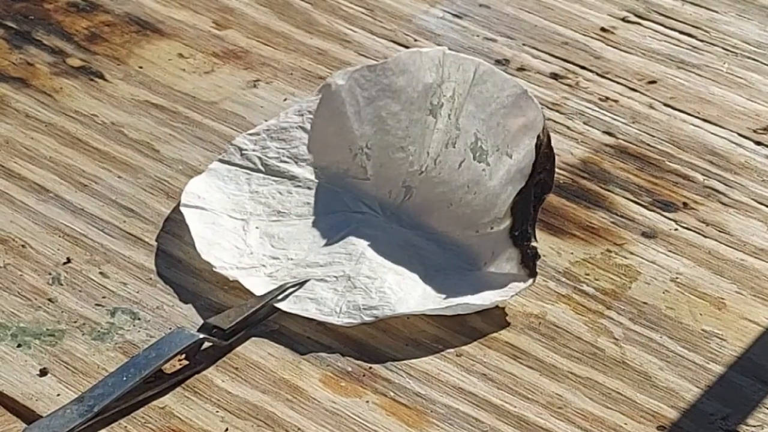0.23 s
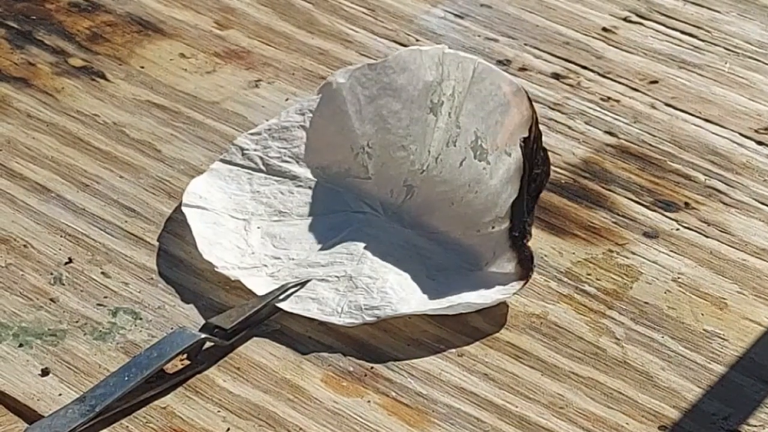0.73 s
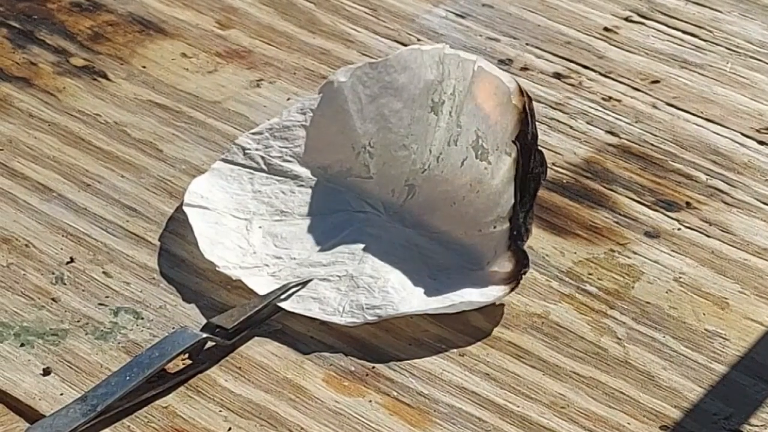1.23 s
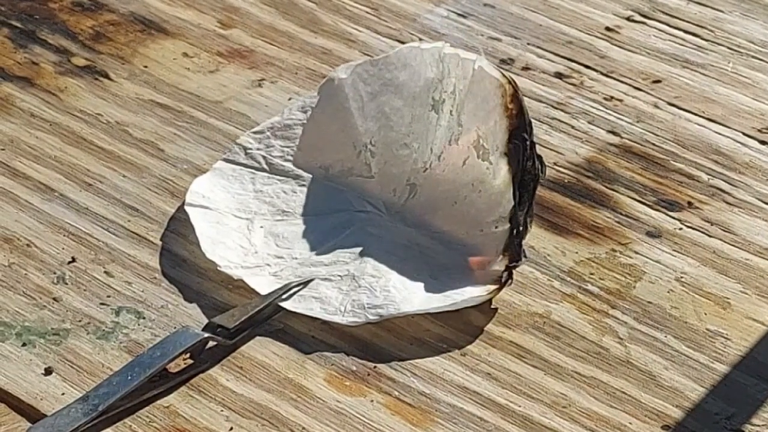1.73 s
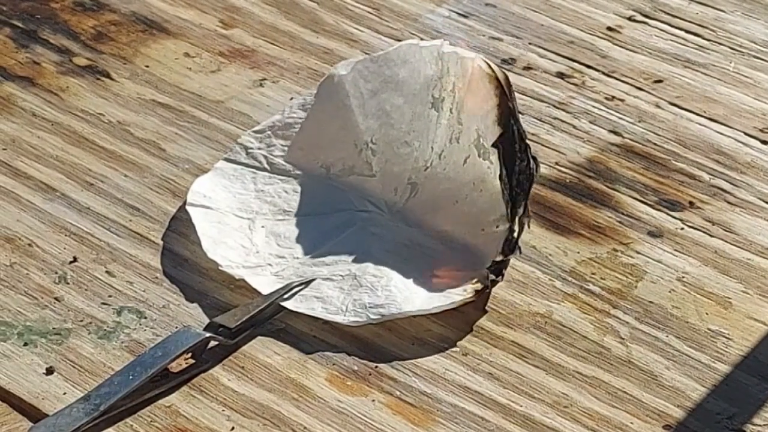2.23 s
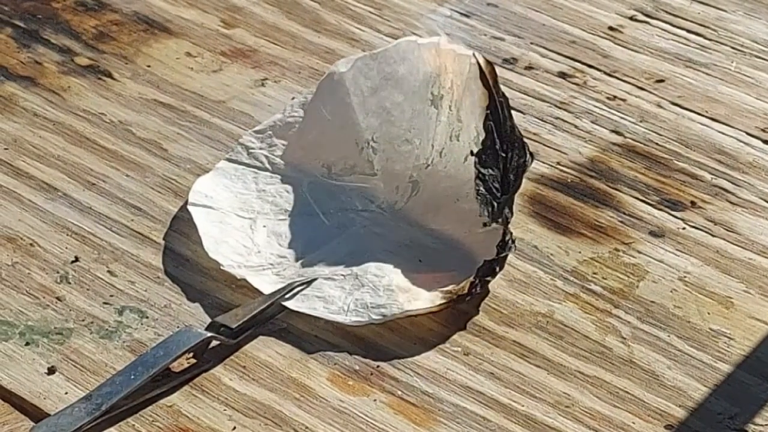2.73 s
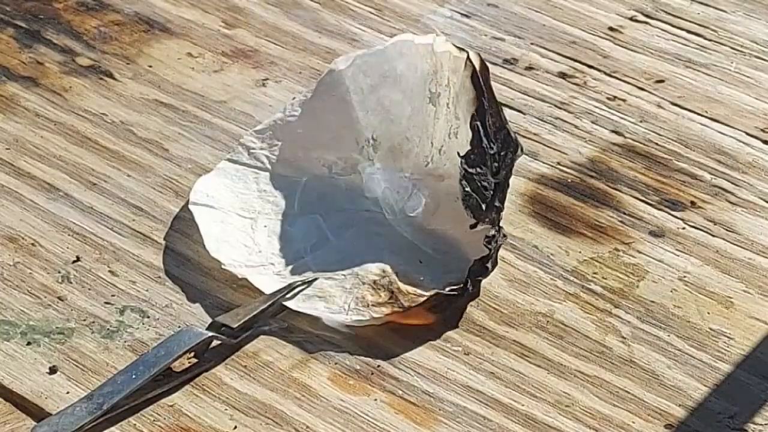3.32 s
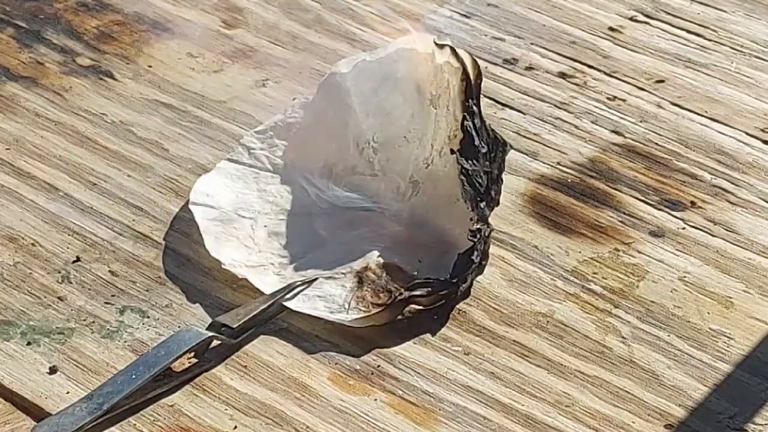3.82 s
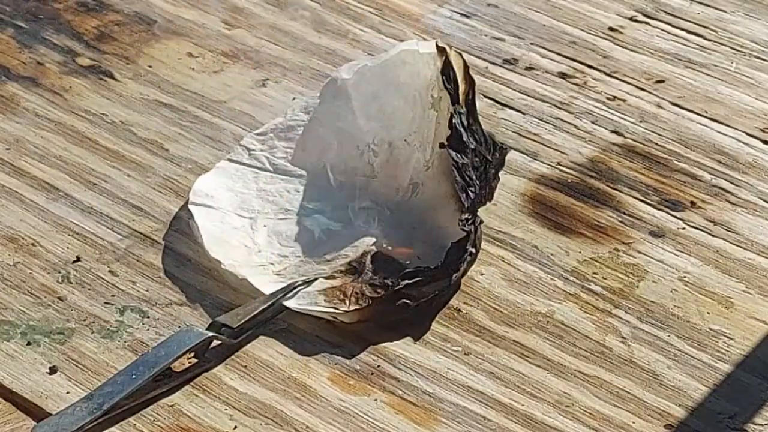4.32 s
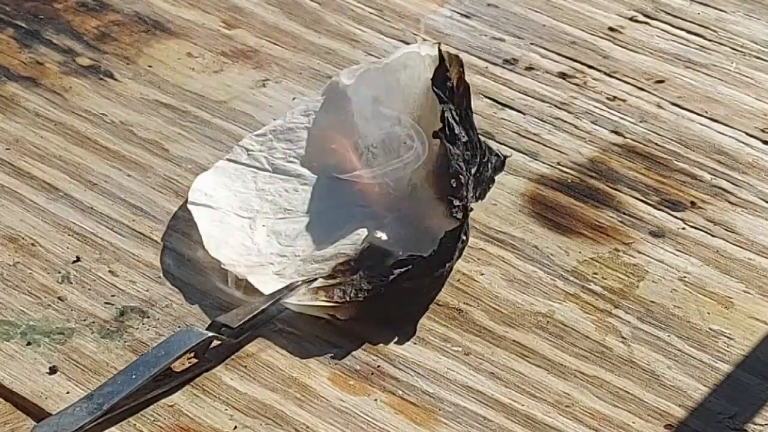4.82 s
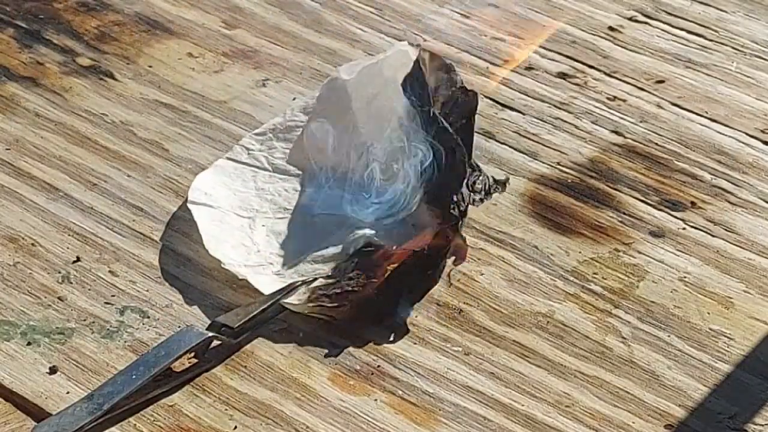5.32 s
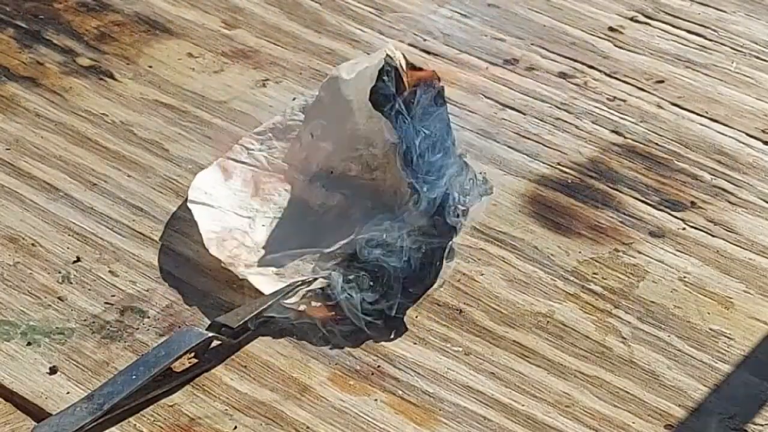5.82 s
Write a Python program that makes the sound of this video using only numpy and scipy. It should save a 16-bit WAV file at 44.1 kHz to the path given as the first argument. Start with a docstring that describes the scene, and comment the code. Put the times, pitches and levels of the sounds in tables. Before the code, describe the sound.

Outdoors, small birds chirp thinly in the distance above a low machine hum and rumble, with a few faint ticks from smouldering paper. The sheet then catches close to the microphone and crackles in sharp, dry, irregular snaps over a fine sizzle. The crackle grows denser, and near the end the flame flares with a soft rustle, flutter and hiss.

```python
"""Paper burning on a board, outdoors.

A folded paper, held in metal tweezers, burns on a wooden board close to a phone's two microphone ports.
The charring sheet snaps in millisecond cracks over a fine sizzle that thickens as the flame spreads.
Small birds whistle in the distance, above a low machine hum and rumble."""
import sys
import numpy as np
from scipy import signal
from scipy.fft import rfft, irfft
from scipy.io import wavfile
from scipy.ndimage import uniform_filter1d

SR = 44100
rng = np.random.default_rng(int(sys.argv[2]) if len(sys.argv) > 2 else 0)


def put_to_file(sound):
    """Save the sound as 16-bit audio at rate SR, in the file named by the first command-line argument."""
    columns = np.atleast_2d(sound).T  # one column per channel
    safe = np.clip(columns, -1, 1)
    whole_steps = np.round(safe * 32767)
    wavfile.write(sys.argv[1], SR, whole_steps.astype(np.int16))


N = 267246
TIME = np.arange(N) / SR
CATCH_S = 1.6  # the sheet starts to crackle

# The main snaps of the sheet. Each row: time in seconds, relative level in dB at 0.8-2.8 kHz,
# bass and treble in dB against that level, rough length in milliseconds.
CRACKS = [(0.365, -77, -2, -8, 2.2), (0.8933, -80, 6, 9, 1.2), (1.352, -85, -4, 10, 0.6),
          (1.6203, -80.5, 1, 13.5, 1), (1.6779, -55.5, -10, 6.5, 0.79), (1.7034, -59.5, -3, 6, 0.32),
          (1.7097, -55.5, -19, -5, 0.47), (1.7153, -57.5, -22, -2, 4.2), (1.7373, -65, -18, 5.5, 1),
          (1.7945, -57, -4, 6, 2.3), (1.8496, -56, -12, -5, 1.2), (1.906, -62, -2, 6.5, 0.46),
          (1.9121, -50, -7, -10, 0.4), (1.954, -65.5, -3, 7, 0.49), (1.996, -67.5, -3, 7.5, 0.63),
          (2.0218, -57, -9, -7, 0.72), (2.0518, -59.5, -5, 8, 0.37), (2.066, -54.5, -16.5, -6, 0.29),
          (2.154, -59, -2, 0, 0.5), (2.1601, -46.5, -8, -2, 0.42), (2.2108, -61, -5, 5, 0.65),
          (2.2438, -44.5, -16, 9, 0.47), (2.274, -52, -16, 3.5, 2.1), (2.2809, -50.5, -14, 0, 0.4),
          (2.289, -49, -19.5, -3, 0.58), (2.3028, -53, -5.5, 5.5, 0.49), (2.309, -47.5, -13, -0.5, 0.6),
          (2.3238, -70, -19, -11, 0.63), (2.3409, -28, -13.5, -1.5, 1.05), (2.4336, -72.5, -16, 18.5, 0.91),
          (2.5193, -79.5, 2, 20.5, 1.3), (2.6957, -60.5, -18, 10.5, 3.5), (2.731, -59.5, -5, 10, 0.5),
          (2.7448, -47.5, -14, 3.5, 0.89), (2.748, -65.5, -14, 14, 0.78), (2.753, -46, -14, -3, 0.39),
          (2.759, -47, -8.5, 4, 1.1), (2.9193, -73.5, 5, 19.5, 0.58), (2.9261, -72.5, 4, 19, 4.2),
          (3.0072, -71, -2, 15, 1.5), (3.0357, -70, -7, 2, 0.7), (3.0468, -56, -9, 8, 0.73),
          (3.076, -65, -6, 14.5, 2.5), (3.1588, -67.5, -17.5, 18.5, 7.2), (3.2335, -56.5, -3, 12, 3.4),
          (3.242, -52, -13, 8, 2.6), (3.2741, -55.5, -21, 7.5, 0.5), (3.2815, -34, -19, -4.5, 1.04),
          (3.2878, -58, 0, 2.5, 0.92), (3.3227, -45, -10, 0.5, 0.74), (3.398, -54, -6, 5.5, 0.89),
          (3.4272, -46, -7, 3, 0.44), (3.4542, -41, 3, 9.5, 0.73), (3.463, -40, 3, 5, 0.69),
          (3.5181, -55, -8, 0, 4.2), (3.5257, -59, 2.5, 10, 1.5), (3.5466, -61, -16.5, 14, 0.29),
          (3.5791, -57.5, -6, 10.5, 2.7), (3.6102, -48.5, -17.5, 2.5, 1.4), (3.633, -40, -6, -3, 0.8),
          (3.6413, -38.5, -1.5, 11.5, 0.37), (3.6441, -21.5, -14, -0.5, 1.8), (3.7262, -54, -11, 2.5, 0.4),
          (3.759, -62, -6, 7, 0.87), (3.8057, -62.5, -8.5, 11.5, 1.3), (3.813, -52.5, -6, 0, 1.7),
          (3.875, -63.5, -7, 10.5, 1), (3.8977, -66.5, 5, 16.5, 0.77), (3.953, -52.5, -12, 8.5, 2.4),
          (3.9613, -57, -6.5, 3, 0.63), (4.001, -61.5, -1, 11, 0.66), (4.0132, -53.5, -5, 5, 0.83),
          (4.0298, -45, -3, 2.5, 0.6), (4.0477, -47.5, 8, 5, 0.98), (4.1248, -68.5, 0, 14, 0.4),
          (4.1762, -65, -12, 17, 1.7), (4.1795, -55, 10, 13.5, 1.7), (4.2438, -60, -23, 6, 0.93),
          (4.25, -60.5, -24, 9, 0.93), (4.2638, -61, -12, 12, 0.61), (4.27, -52.5, -28.5, 9, 0.54),
          (4.2826, -59.5, -3, 7, 0.5), (4.2999, -49, -14, 7.5, 0.16), (4.3067, -45.5, -18, 5.5, 1.2),
          (4.3102, -42, -1, 4, 0.96), (4.4403, -70, -6, 18, 1.6), (4.4619, -51.5, -7, 6, 0.33),
          (4.4851, -51, -0.5, 3.5, 0.24), (4.5241, -63, 7.5, 10, 2.6), (4.5764, -66, -1, 17, 7.5),
          (4.6413, -56.5, -2, 6.5, 2.4), (4.6671, -56, -7, -7, 0.79), (4.6916, -50, -7.5, 3.5, 1.2),
          (4.723, -43.5, -11, 4.5, 0.89), (4.7332, -38, -8.5, 8.5, 0.29), (4.7574, -44, -5, 0.5, 0.24),
          (4.7684, -42.5, -8, -4, 2.4), (4.7774, -43, -3, -4, 3.1), (4.7833, -43.5, -0.5, 1.5, 2.1),
          (4.913, -61, -17, -1.5, 2.4), (4.9431, -40, -10.5, -1.5, 1.9), (4.9525, -53, -23, -0.5, 1.2),
          (4.9693, -53.5, 5, 5.5, 2.9), (4.98, -52, -11, 3.5, 1.7), (5.032, -52.5, -15, 0, 3.9),
          (5.089, -56, -17, -1.5, 0.6), (5.1135, -63.5, -7, 4.5, 0.85), (5.1752, -55.5, 0, 1.5, 0.67),
          (5.2267, -59, 6.5, 0.5, 2.6), (5.248, -65, 8, 4, 0.52), (5.2605, -43, -1, -7, 2.4),
          (5.2673, -49.5, 10, -1.5, 2.1), (5.3876, -34, -0.5, -8, 1.48), (5.3998, -71, 3, 20, 1.6),
          (5.467, -49, -2.5, -10.5, 1.07), (5.499, -40.5, -5.5, -9, 3.4), (5.526, -46, -7.5, -4.5, 1.2),
          (5.5316, -36, -17, -7, 1.1), (5.592, -42.5, -23, -9, 1.1), (5.6697, -39, -10.5, -21.5, 0.71),
          (5.7806, -44, -12, -5, 3.7), (5.7896, -47.5, 4.5, -4, 1.0), (5.8504, -48.5, -8, -7, 1.8),
          (5.95, -41.5, -11, -15.5, 2.3), (5.9737, -62, 7, -12, 1.6), (6.0037, -52, 1, 5, 0.33),
          (6.0532, -26.5, -6, -10.5, 0.26)]
# How hard the edge burns. Each row: time in seconds, relative level in dB.
BURN = [(1.55, -88.0), (1.67, -70.0), (2.12, -74.0), (2.36, -61.0), (2.51, -81.0), (2.538, -68.5),
        (2.658, -80.0), (2.748, -64.5), (2.872, -80.0), (3.17, -63.0), (3.35, -67.0), (3.44, -53.0),
        (3.529, -65.0), (3.71, -53.0), (3.77, -71.5), (4.04, -62.0), (4.071, -72.0), (4.28, -60.0),
        (4.4, -71.0), (4.94, -51.0), (5.0, -67.0), (6.03, -56.0)]
# How high the flame flares. Each row: time in seconds, relative level in dB.
FLARE = [(4.401, -84), (4.761, -64.5), (4.849, -67), (4.939, -62), (5.179, -79.5), (5.271, -69),
         (5.359, -78), (5.39, -63.5), (5.6, -53), (5.839, -65.5), (6.03, -55)]


def undb(db):
    return 10 ** (np.asarray(db) / 20)


def unit(x):
    return x / np.sqrt(np.mean(x ** 2) + 1e-30)


def on_log(hz, table, column=1):
    """One column of a table, read along a logarithmic frequency axis."""
    table = np.array(table, float)
    return np.interp(np.log(hz + 1), np.log(table[:, 0]), table[:, column])


def level_db(curve):
    """A level curve at every sample; silent before it starts."""
    return np.interp(TIME, *np.transpose(curve), left=-120)


def colour(x, table):
    """Filter by a curve of (Hz, dB) points, at unit level."""
    return unit(irfft(rfft(x) * undb(on_log(np.fft.rfftfreq(N, 1 / SR), table)), N))


def walk(rate_hz):
    """Smooth random drift with a spread near 1."""
    hold = int(SR / rate_hz)
    steps = np.repeat(rng.standard_normal(N // hold + 1), hold)
    return unit(uniform_filter1d(steps, hold)[:N])


def add(out, x, start_s):
    """Mix a stereo sound in at its time."""
    i = int(round(start_s * SR))
    a, b = max(i, 0), min(i + x.shape[1], N)
    if b > a:
        out[:, a:b] += x[:, a - i:b - i]


def panned(x, pan_db):
    return x * undb(np.array([[pan_db], [-pan_db]]) / 2)


def ports(x):
    """Sound reaches the two microphone ports with unequal level and phase."""
    # Each row: frequency in Hz, left minus right in dB, left's phase lead in radians.
    response = [(100, -9, 0), (250, -6, 0), (450, -3.5, 0), (1900, -2.7, .1), (5000, -1.5, .45),
                (8300, -2.5, 1.2), (10100, 1, 1.9), (11500, 1.3, 1.7), (14000, .5, 2.0), (16000, 4, 2.2)]
    hz = np.fft.rfftfreq(N, 1 / SR)
    sides = np.array([[.5], [-.5]])
    gain = undb(sides * on_log(hz, response))
    gain /= np.sqrt(np.mean(gain ** 2, axis=0))
    return irfft(rfft(x) * gain * np.exp(1j * sides * on_log(hz, response, column=2)), N)


def echoes(x, t60, dull_hz, delay_s):
    """Diffuse reflections, different at each port."""
    t = TIME[:SR]
    tail = rng.standard_normal((2, SR)) * np.exp(-np.log(1000) * t / t60) * (t > delay_s)
    tail = signal.lfilter(*signal.butter(1, dull_hz, fs=SR), tail)
    tail /= np.sqrt(np.sum(tail ** 2, axis=1, keepdims=True))
    return signal.fftconvolve(x.mean(0)[None], tail, axes=1)[:, :N]


def outdoors(air_db=-69.5, split_hz=380, waver_db=3):
    """A distant machine hums in a rumble shared by both ports; the faint hiss above is diffuse."""
    # The outdoor air. Each row: frequency in Hz, relative level in dB.
    air = [(15, -81), (25, -26), (40, -12), (64, -2), (206, -19), (242, -22), (373, -27), (451, -28),
           (489, -32), (624, -33), (962, -37.5), (1040, -38), (1130, -35.5), (3520, -42), (16000, -43.5)]
    # The machine's tones. Each row: frequency in Hz, level in dB.
    tones = [(59.3, -74.5), (119, -70), (237, -80)]
    low, high = (signal.butter(2, split_hz, kind, fs=SR, output="sos") for kind in ("low", "high"))
    rumble = signal.sosfilt(low, colour(rng.standard_normal(N), air)) * undb(air_db + 0.86 * walk(0.79))
    hiss = signal.sosfilt(high, colour(rng.standard_normal((2, N)), air)) * undb(air_db)
    hum = np.zeros(N)
    for hz, db in tones:
        tone = np.sin(2 * np.pi * hz * TIME + 2.43 * walk(13))
        hum += unit(tone * undb(waver_db * walk(17))) * undb(db)
    return ports(rumble + hum) + panned(hiss, pan_db=-2.5)


def birds(direct_db=-5, wet_db=-5.5, flutter_db=3.5, arch_hz_per_s=1100):
    """Three distant birds call in thin whistles, smeared by the surroundings."""
    # Rising chirps. Each row: start in seconds, end pitch in Hz, relative level in dB.
    chirps = [(.26, 8550, -69), (.62, 7950, -71), (1.125, 8450, -74), (1.865, 8600, -69), (2.51, 8900, -73),
              (3.325, 8500, -69)]
    # Arching whistles. Each row: start and length in seconds, top pitch in Hz, relative level in dB.
    whistles = [(-.2, 0.24, 7010, -82), (0.342, 0.45, 7110, -77), (1.298, .22, 6630, -88),
                (5.765, 0.096, 7220, -70.5)]
    # Short falling peeps. Each row: start in seconds, relative level in dB.
    peeps = [(.268, -81), (.535, -80)]
    out = np.zeros((2, N))
    waver, flutter = walk(400), walk(70)

    def call(start_s, sweep_hz, db, length_s, pan_db):
        """Glide through a start, middle and end pitch."""
        u = np.linspace(0, 1, int(length_s * SR))
        hz = np.polyval(np.polyfit([0, .5, 1], sweep_hz, 2), u)
        hz *= 1 + .009 * waver[:len(u)]  # a quick tremble gives a slight rasp
        swell = np.sqrt(np.abs(np.sin(np.pi * u ** 1.7))) * undb(flutter_db * flutter[:len(u)])
        tone = unit(swell * np.sin(2 * np.pi * np.cumsum(hz) / SR))
        add(out, panned(tone * undb(db), pan_db), start_s)

    for s, end_hz, db in chirps:
        call(s, np.geomspace(7200, end_hz, 3), db, length_s=.075, pan_db=-2)
    for s, length_s, top_hz, db in whistles:
        call(s, top_hz - arch_hz_per_s * length_s * np.array([1, 0, .5]), db, length_s, pan_db=-17)
    for s, db in peeps:
        call(s, (1700, 1620, 1430), db, length_s=.022, pan_db=-2)
    return undb(direct_db) * out + undb(wet_db) * echoes(out, t60=.25, dull_hz=12000, delay_s=.006)


def snap(band_db, length_ms, size, kick=1.42, shiver_db=-22):
    """One fracture: fibres start to give, part with a pressure kick, and the sheet shivers briefly."""
    # The colour of the sheet. Each row: frequency in Hz, relative level in dB.
    paper = [(30, -33), (120, -8), (230, 1.5), (310, -5), (480, 0.5), (750, 0), (1200, 5.5), (2100, 2),
             (3100, 0), (4300, 2), (6000, -1.5), (8300, 5), (9900, -3.5), (12000, 6.5), (16000, 1.5)]
    # The edges in Hz of four bands: bass, middle, presence and top octave.
    edges_hz = [150, 800, 2800, 8000, 16000]
    ms = (np.arange(size) - size // 4) / SR * 1000
    apart_ms = np.abs(ms)
    hz = np.fft.rfftfreq(size, 1 / SR)
    polarity, height, side, pan = rng.uniform(-1, 1, 4)
    fibres, sheet = rng.standard_normal((2, size))
    burst = fibres * np.exp(-apart_ms / (max(length_ms, .1) * np.where(ms < 0, 0.62, 0.96)))
    shiver = sheet * undb(shiver_db) * np.exp(-apart_ms / np.where(ms < 0, 2.5, 4.2))
    # a sharp push followed by a slower suction
    push = (ms >= 0) * (np.exp(-apart_ms / 0.26) - 0.46 * np.exp(-apart_ms / 0.5))
    spectrum = rfft(burst + shiver + kick * push * np.sign(polarity))
    # char is too damped to ring: the burst is spread evenly and takes the colour of the sheet
    spectrum *= undb(on_log(hz, paper)) / np.sqrt(uniform_filter1d(np.abs(spectrum) ** 2, size=45))
    # a bounce off the board, later for higher places on the sheet, combs each snap differently
    bounce_s = 0.565e-3 * 2 ** height
    spectrum *= 1 + .2 * np.sign(pan) * np.exp(-2j * np.pi * hz * bounce_s)
    # each fragment radiates its own share of every band, taken over 4 ms
    power = np.add.reduceat(np.abs(spectrum) ** 2, np.searchsorted(hz, edges_hz))[:-1]
    gain_db = band_db - 10 * np.log10(2 * power / size / (.004 * SR))
    centres_hz = np.sqrt(np.multiply(edges_hz[1:], edges_hz[:-1]))
    spectrum *= undb(on_log(hz, np.column_stack([centres_hz, gain_db])))
    # its place also shifts level and arrival time between the ports
    lead_s = 8e-6 * side * np.array([[.5], [-.5]])
    return panned(irfft(spectrum * np.exp(2j * np.pi * hz * lead_s)), 1.8 * pan)


def cracks(rows, edge_db=12.5, edge_fade_s=0.41, char_db=2.5, dulling_db_per_s=1.5, size=1024):
    """A snap for each row: the thin first edge is brightest, and the char dulls as it thickens."""
    out = np.zeros((2, N))
    for s, db, bass_db, treble_db, length_ms in rows:
        age_s = s - CATCH_S
        # top octave over the presence band
        tilt_db = edge_db * np.exp(-abs(age_s) / edge_fade_s) + char_db
        tilt_db -= dulling_db_per_s * max(age_s, 0)
        band_db = db + np.array([bass_db, 0, treble_db - tilt_db / 2, treble_db + tilt_db / 2])
        add(out, snap(band_db, length_ms, size), s - size // 4 / SR)
    return out


def board(snaps):
    """The board under the paper hums for a moment after each snap."""
    # Its low resonances. Each row: frequency in Hz, seconds to fall by 60 dB, gain in dB.
    modes = [(128, 0.21, 3.5), (234.5, 0.23, 2), (375, .05, -4)]
    t = TIME[:SR // 2]
    ring = np.zeros(len(t))
    for hz, t60, db in modes:
        damping = np.log(1000) / t60
        ring += undb(db) * 2 * damping / SR * np.exp(-damping * t) * np.cos(2 * np.pi * hz * t)
    return signal.fftconvolve(snaps, ring[None], axes=1)[:, :N]


def smoulder(span_s=(.8, .99), base_db=-85, spread_db=3, count=6):
    """A short run of faint ticks from the glowing edge before it catches."""
    when, size = rng.random((count, 2)).T
    times = np.interp(np.arange(count) + when, [0, count], span_s)
    levels_db = base_db + spread_db * (2 * size - 1)
    return cracks((s, db, -7, 3, 2.5) for s, db in zip(times, levels_db))


def ticks(under_db=-10.5, spread_db=3.5, cluster_s=.007, count=80):
    """Single fibres part shortly before and after the snaps, as the strain in the sheet shifts."""
    size, bright, slow, delay = rng.standard_normal((count, 4)).T
    snaps = np.array(CRACKS)[rng.integers(len(CRACKS), size=count)]
    times = snaps[:, 0] + cluster_s * delay
    db = np.minimum(snaps[:, 1], -52) + under_db + spread_db * np.minimum(size, 1.5)
    bass_db, treble_db = -8 - 2 * bright, 4 + 2.6 * bright
    length_ms = 0.4 * np.exp(.5 * slow)
    return cracks(zip(times, db, bass_db, treble_db, length_ms))


def grains(per_s, smear_ms, smear):
    """Dense tiny pops of uneven size, each with a short rustle after it."""
    pops = (rng.random(N) < per_s / SR) * undb(3.2 * np.minimum(rng.exponential(size=N), 3))
    fade = np.exp(-1000 / (smear_ms * SR))
    rustle = np.sqrt(signal.lfilter([1], [1, -fade], pops ** 2)) * rng.standard_normal(N)
    return unit(pops * rng.choice([-1, 1], N)) + smear * unit(rustle)


def flame(sizzle_db=-8, spit_db=-6, flutter_db=-9, flutter_hz=(45, 180)):
    """The char fizzes, harder under the flaring flame, which rustles and flutters in the bass."""
    # The colours of flame and char. Each row: frequency in Hz, relative level in dB.
    rustle_colour = [(40, -15.5), (110, 2), (250, -4), (700, -4.5), (1300, -6.5), (2000, -12),
                     (3200, -15.5), (6500, -20.5), (10000, -29), (15000, -16)]
    sizzle_colour = [(300, 3.5), (1200, -5.5), (3000, 0.5), (4300, -1.5), (6000, -3.5), (8300, 3.5),
                     (9900, -15), (12000, 2.5), (15500, 2), (17000, -6)]
    flare = undb(level_db(FLARE))
    rustle = colour(grains(per_s=700, smear_ms=1.4, smear=2.2), rustle_colour)
    bass_band = signal.butter(2, flutter_hz, "band", fs=SR, output="sos")
    flutter = unit(signal.sosfilt(bass_band, rng.standard_normal(N)))
    heat = np.hypot(undb(level_db(BURN) + sizzle_db), flare * undb(spit_db))
    sizzle = colour(grains(per_s=750, smear_ms=1.3, smear=1.7), sizzle_colour)
    return flare * (rustle + undb(flutter_db) * flutter) + heat * sizzle


def crackle(base_db=-66.5, follow=0.83, crowding=.75, flame_dulls_db=8, thinning=0.6, count=230):
    """Small fractures come thicker and stronger with the heat."""
    when, size, low, bright, slow = rng.random((count, 5)).T
    edge, blaze = undb(level_db(BURN)), undb(level_db(FLARE) + 1)
    heat = np.hypot(edge, blaze)
    chances = np.cumsum(heat ** crowding * (TIME > CATCH_S))
    times = np.interp(when, chances / chances[-1], TIME)
    size_db = 10 * size ** 1.5 - 3
    heat_db = 20 * np.log10(np.interp(times, TIME, heat)) + 60
    db = base_db + follow * heat_db + size_db
    bass_db = -6 + 14 * (low - .5)
    # the smallest sound thinnest, those in the flame dullest
    flame_share = np.interp(times, TIME, blaze / heat) ** 2
    treble_db = 5 - thinning * size_db - flame_dulls_db * flame_share + 12 * (bright - .5)
    length_ms = 0.52 * 6 ** slow
    return cracks(zip(times, db, bass_db, treble_db, length_ms))


def gas(gain_db=-5):
    """Hot gas spits out of the char while the flame is up, hissing at the very top."""
    # The colour of the hiss. Each row: frequency in Hz, relative level in dB.
    hiss_colour = [(300, -35), (3000, -10.5), (6000, -25), (10000, -22), (12500, -4.5), (15600, 1),
                   (16500, -20)]
    hiss = colour(grains(per_s=720, smear_ms=0.8, smear=.9), hiss_colour)
    return undb(level_db(FLARE) + gain_db) * hiss


def scene(crack_db=-0.5, near_db=-18, far_db=-28, far_cut_hz=500):
    """The fire up close, quick reflections from things around it, and the thin echo of the yard."""
    snaps = undb(crack_db) * cracks(CRACKS)
    fire = snaps + smoulder() + crackle() + ticks() + flame() + gas()
    near = undb(near_db) * echoes(fire, t60=0.029, dull_hz=11700, delay_s=0.00081)
    far = undb(far_db) * echoes(fire, t60=0.31, dull_hz=6000, delay_s=0.0057)
    far = signal.lfilter(*signal.butter(1, far_cut_hz, "high", fs=SR), far)
    return ports(fire + board(snaps)) + near + far + birds() + outdoors()


def record(dry):
    """The phone cuts steeply above 16.25 kHz."""
    return signal.sosfiltfilt(signal.ellip(8, .05, 50, 16250, fs=SR, output="sos"), dry)


dry = scene()
out = record(dry)
put_to_file(out)
```